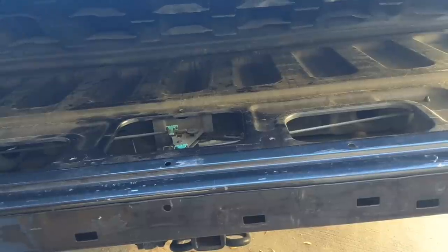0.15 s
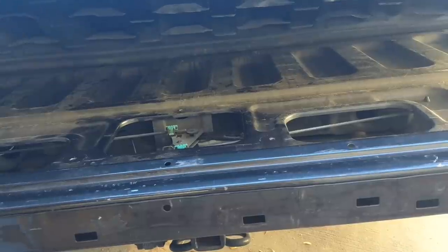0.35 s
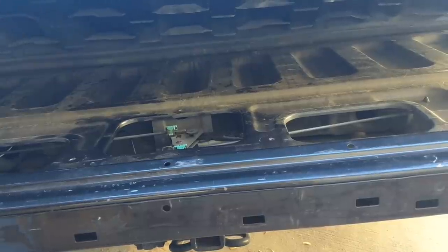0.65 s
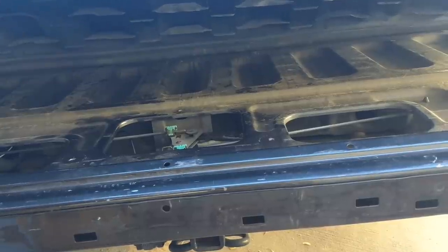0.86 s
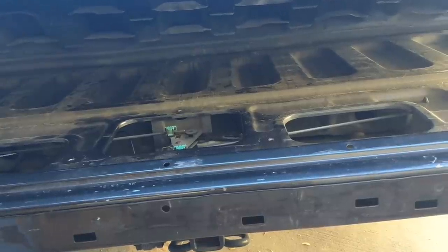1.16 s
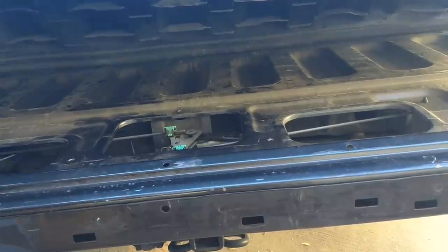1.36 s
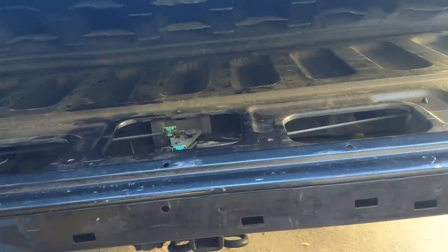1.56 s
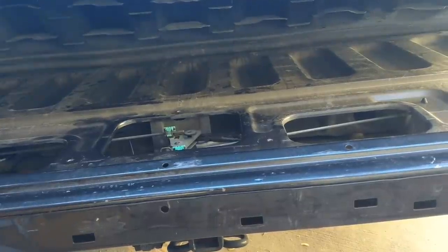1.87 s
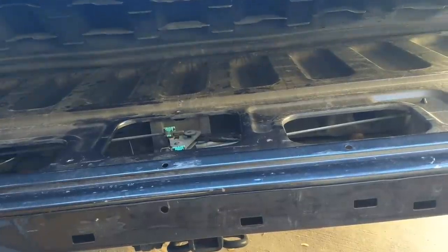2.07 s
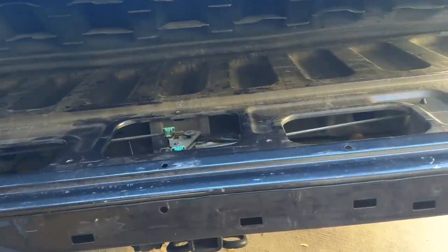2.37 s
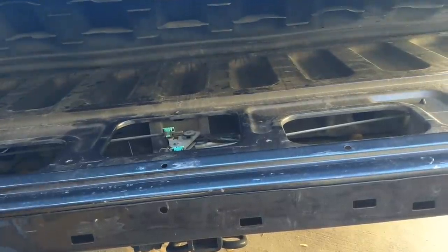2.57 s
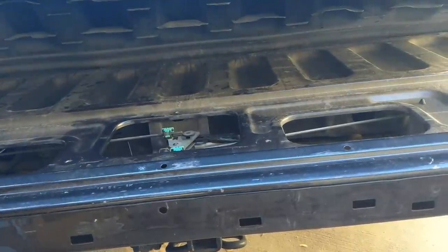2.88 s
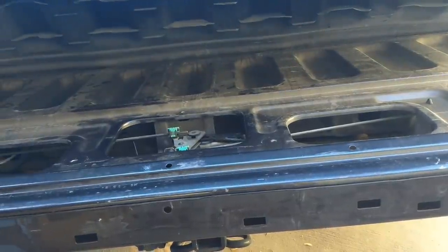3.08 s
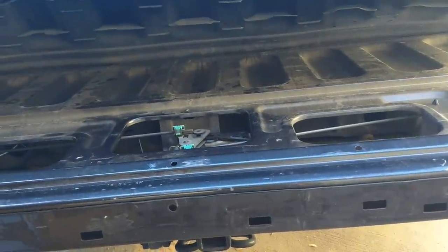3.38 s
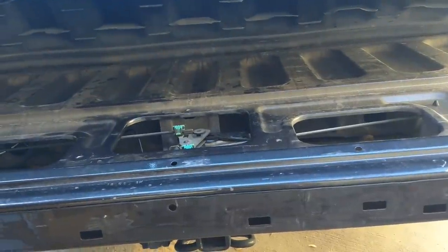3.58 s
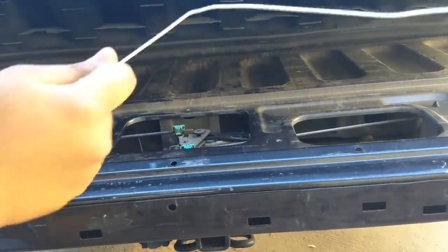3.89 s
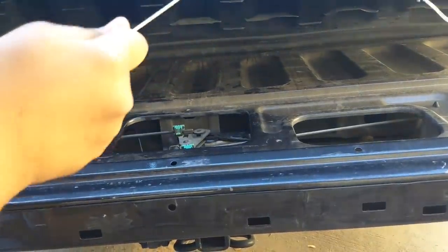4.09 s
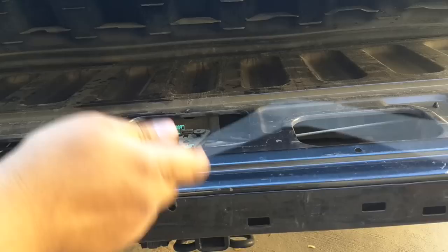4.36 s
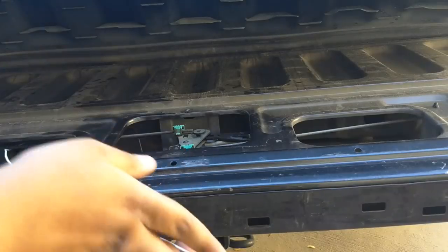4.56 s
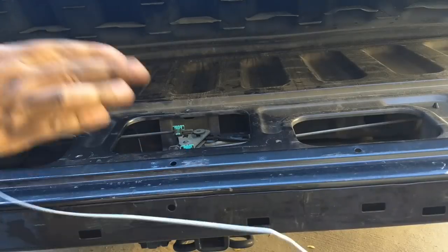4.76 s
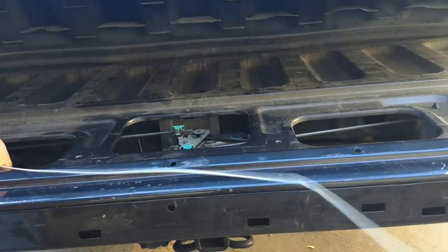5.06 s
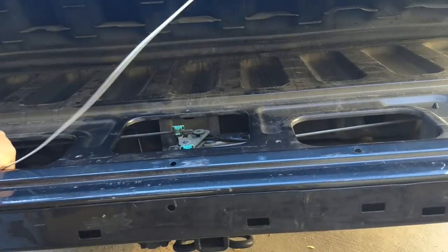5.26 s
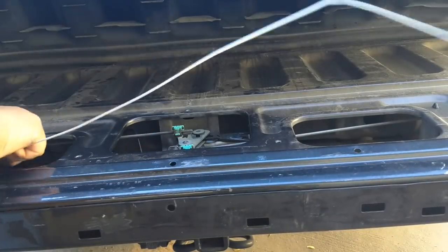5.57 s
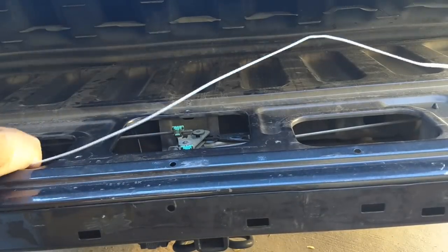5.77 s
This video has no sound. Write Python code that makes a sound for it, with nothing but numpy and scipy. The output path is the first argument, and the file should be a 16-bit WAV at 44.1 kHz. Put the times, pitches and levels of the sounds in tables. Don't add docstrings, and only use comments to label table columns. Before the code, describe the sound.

Thin wire worked through openings in a steel panel: an early heavy knock and faint nudges, busy bright scraping with rattling taps and boomy thuds, then a piercing click followed by near silence. Tapping grows back into another brief rasp and click, finishing with a loud double slap. Close stereo phone microphone, wide treble, distant street rumble.

```python
import sys
import numpy as np
from scipy import signal
from scipy.fft import rfft, irfft, next_fast_len
from scipy.io import wavfile
from scipy.ndimage import uniform_filter1d, minimum_filter1d, map_coordinates

SR = 44100
rng = np.random.default_rng(int(sys.argv[2]) if len(sys.argv) > 2 else 0)


def field_ratio(decibels):
    return 10 ** (np.asarray(decibels, dtype=float) / 20)


def master_out(mix):
    frames = np.transpose(np.atleast_2d(mix))
    ceiling = np.clip(frames, -1, 1)
    pcm = np.round(ceiling * 32767).astype(np.int16)
    wavfile.write(sys.argv[1], SR, pcm)


N = 261513

# [f/Hz, level/dB per Hz]
TRAFFIC_SPECTRUM = [(25, -31), (70, 9), (190, 1.1), (320, -9), (800, -13.5), (2000, -31.5), (15000, -55.5),
                    (16500, -70.5)]
# [f/Hz, width/Hz, level/dB]
AIR_SPACES = [(90, 24, 1), (116.5, 8.1, 7.5), (176, 18, 4.5), (230.2, 18, 3.5), (252, 4, 1),
              (470.6, 16, 5.5), (686, 6.7, 0.5)]
# [f/Hz, level/dB per Hz]
BOOM_SPECTRUM = [(25, -23.5), (60, 4), (110, 1.5), (190, 3), (320, -8.5), (800, -9.5), (1800, -30),
                 (5000, -48)]
# [t/s, level/dB, rise/s]
BUMPS = [(0.307, -23, 0.0026), (1.23, -22, 0.024), (1.51, -20.5, 0.028), (1.655, -28, .02),
         (2.09, -24, 0.023), (2.24, -20, 0.038), (2.35, -17.5, .03), (2.79, -27, 0.0051), (4.16, -32, .03),
         (4.5, -32.5, 0.073), (5.08, -19.5, 0.034), (5.579, -22, 0.042), (5.8, -32, 0.043)]
# [t/s, level/dB]
RUB = [(0, -66), (.4, -60.5), (.74, -67.5), (1.0, -57.5), (1.13, -50.5), (1.44, -39), (1.58, -33.5),
       (1.75, -39.5), (1.95, -41), (2.1, -44.5), (2.31, -61.5), (2.44, -34.5), (2.7, -37), (2.82, -59.5),
       (4.65, -57.5), (4.84, -42.5), (5.11, -36), (5.22, -58.5)]
# [f/Hz, level/dB per Hz]
RASP_SPECTRUM = [(1200, -33), (2200, 11.5), (3300, 3.5), (5000, 4.5), (7200, -10.5), (8200, -13),
                 (10000, -19.5), (12000, -43.5)]
# [f/Hz, level/dB per Hz]
KNOCK_SPECTRUM = [(120, -43), (200, 2.5), (350, -9.5), (600, -2), (850, -0.5), (1500, -6), (2200, -6),
                  (3200, -36.5)]
CLANK_SPECTRUM = [(1200, -33.5), (1900, -6.5), (2600, 3.5), (3300, -1), (3900, -6.5), (5500, -32.5)]
RING_SPECTRUM = [(3600, -12.5), (4800, 1.5), (6000, -4.5), (7200, 1.5), (8200, -9.5), (10000, -24),
                 (12000, -41.5)]
EDGE_SPECTRUM = [(7000, -14), (9000, 2), (10500, -1), (13000, -5), (15300, -8), (16000, -15.5),
                 (16800, -47)]
# [f/Hz, spread/Hz, level/dB]
PANEL_MODES = [(203, 16, -5.5), (482, 28, -12), (756, 30, -26), (836.5, 54, 5), (1050, 52, -0.5),
               (1373, 18, 2.5), (1567, 41, 1.5), (2800, 380, -7.5), (3304, 63, 0), (3587, 100, 2.5),
               (4360, 460, -3.5), (6220, 280, -4), (7880, 290, -15.5), (10100, 250, -19)]
# [f/Hz, level/dB, t60/s]
WIRE_MODES = [(5500, -15.5, 0.22), (5230, -5.5, 0.054), (5540, -20, 5.0), (5700, -3.5, 0.027),
              (5740, -9, 0.054), (7510, -31, 0.35), (7970, -44, 5.0), (8530, -38, 1.8)]
# [t/s, level/dB]
SLAPS = [
    (5.875, -1),
    (5.915, -9),
]
# [t/s, peak level/dB, body re treble/dB]
TICKS = [
    (1.7148, -20.5, -8),
    (2.688, -23, 0),
    (3.0943, -3.5, 1.5),
    (3.0977, -14, 2),
    (5.2305, -3.5, -22.5),
    (5.873, -15.5, 4),
    (5.9148, -19, 3),
]
# [t/s, peak level/dB, weight/dB, t60/s]
CRISP_TAPS = [(.2842, -37, 0, 0.31), (0.6608, -27, -27, .11), (1.1387, -39.5, -21, 0.46),
              (1.4018, -25, -13, .22), (1.5429, -21.5, -1.5, 0.24), (1.6062, -24, -30, 0.21),
              (1.7139, -15, -8.5, .15), (1.9328, -26, 3, 0.2), (2.2642, -17.5, 3.8, 0.24),
              (2.311, -24, 4.5, .14), (2.3446, -19.5, -4.5, .16), (2.4609, -17.5, -6.5, 0.44),
              (2.4783, -16.5, -3, 0.21), (3.1146, -23.5, -1, 0.23), (3.1873, -31.5, -5.5, 0.21),
              (3.7722, -35, -7, 0.22), (4.067, -44.5, -1, 0.19), (4.3565, -21.5, -6.5, 0.18),
              (4.7692, -18.5, -5, 0.35), (4.8766, -18.5, 0.5, 0.19), (4.9708, -20, -4, 0.18),
              (4.9894, -17.5, 0, 0.15), (5.2300, -18.5, -4.5, 0.24), (5.5019, -34, -1, 0.23)]
# [t/s, peak level/dB, weight/dB, t60/s]
PLAIN_TAPS = [(.0034, -31, -12.5, 0.19), (.1989, -40.5, 1.5, 1), (.2309, -34, 1, 0.35),
              (.266, -26, -21, 0.39), (0.3052, -8.5, -10.5, 0.066), (0.9043, -34, -6.5, 0.2),
              (1.067, -39.5, -4, 0.18), (1.2042, -23.5, -5.5, .21), (1.4172, -20.5, -5, 0.23),
              (1.488, -22, -27, 0.27), (1.6377, -20.5, -2, 0.24), (1.8478, -20, -3, .14),
              (1.9904, -27, -18, 0.14), (2.0283, -18, -4.5, 0.21), (2.244, -37, -3, 0.3),
              (2.3792, -25, -17.5, 0.58), (2.5583, -20.5, -31.5, 0.21), (2.9006, -31.5, -4, 0.13),
              (4.1794, -52.5, 13.5, .2), (4.2717, -28.5, -7.5, 0.17), (5.0386, -19.5, 5.5, 0.25),
              (5.201, -32, -5, 0.26), (5.5427, -17.5, -2.5, 0.21), (5.7662, -40.5, 7.5, .28),
              (5.476, -42, -10, 0.14)]
# [t/s, peak level/dB, weight/dB, t60/s]
DULL_TAPS = [(.3914, -34.5, -5, 0.09), (.4609, -47, -18.5, 0.18), (.522, -42.5, -11.5, 0.28),
             (.6649, -27, -3.5, 0.15), (.7552, -39, 2.5, 0.16), (1.0799, -35.5, -3, 0.31),
             (1.3038, -31.5, -15, 0.15), (1.387, -32.5, -5, 0.39), (1.7934, -24, 1.5, 0.19),
             (2.7877, -48.5, 21.5, 0.098), (3.0415, -50.5, 8.5, 0.13), (4.4585, -40.5, 12, 0.15),
             (4.5662, -28.5, 1, .28), (4.7964, -15, -24, 0.071), (5.1517, -27, -20, 0.17),
             (5.6096, -26.5, 1, 0.16), (5.8112, -31.5, -4.5, 0.17), (5.8526, -28.5, -5.5, 0.17)]
# [t/s, peak level/dB, weight/dB, t60/s]
FLAT_TAPS = [
    (1.2456, -30, 1.7, 0.12),
    (4.85, -39.5, 18, 0.18),
    (5.0965, -19, -5.5, 0.096),
    (5.874, -7, -13.5, .18),
    (5.915, -4.5, -25, 0.11),
]
# [t/s, peak level/dB, weight/dB, t60/s]
HEAVY_TAPS = [
    (0.3108, -14.5, 3.5, 0.14),
    (2.6837, -14.5, 0.5, 0.16),
    (3.2915, -35, 15.5, 0.19),
    (4.5876, -18, 0.5, 0.17),
]
# [edge level/dB, clank level/dB]
KIND_COLOURS = [
    (-13.5, -7),
    (-18.5, -7),
    (-24, -6.5),
    (-19, -20.5),
    (-15, -4.5),
]
# [f/Hz, likeness/1]
PORT_LIKENESS = [(50, 1), (130, 0.99), (260, 0.94), (520, 0.66), (800, 0.39), (1300, 0.033), (15000, .02)]
# [f/Hz, level/dB]
BODY_SHADE = [(40, -.8), (130, -1.4), (260, -2), (520, -2.8), (1000, -3.3), (3000, -4), (15000, -4)]
# [f/Hz, level/dB per Hz]
HISS_SPECTRUM = [(300, -22), (2000, -0.5), (9000, 5), (15200, -0.5), (16000, -41.5)]
# [f/Hz, level/dB per Hz]
HANDLING_SPECTRUM = [(25, -8.5), (60, -16), (110, -14), (300, -36.5), (1000, -57.5)]
# [t/s, depth/dB, attack/s]
DUCKS = [
    (3.097, 32.5, 0.014),
    (5.239, 15, 0.072),
]

LOUD_RUB_DB = -35
DRONE_DB, DRONE_PER_RUB = -36.5, 0.56
BOOM_DB, BOOM_PER_RUB = -32.5, 0.35
BUMP_T60_S = 0.38
STREET_DB = -41
RECOVER_S = 0.64
SCATTER_DB, SCATTER_T60_S = -8, 0.01
PORT_LAG_SAMPLES = 18.8
PANEL_TOP_HZ, TOP_HZ = 15600, 16750


def unit(x):
    return x / np.sqrt(np.mean(x ** 2) + 1e-20)


def along(points, hz):
    f, v = np.transpose(points)
    return np.interp(np.log(hz + 1), np.log(f + 1), v)


def rub_level_db():
    s, db = np.transpose(RUB)
    return np.interp(np.arange(N) / SR, s, db)


def wobble(rate_hz):
    knots = rng.standard_normal(int(N * rate_hz / SR) + 4)
    return map_coordinates(knots, [np.arange(N) * rate_hz / SR])


def filtered(x, response):
    m = next_fast_len(N + 8192)
    return irfft(rfft(x, m) * response(np.fft.rfftfreq(m, 1 / SR)), m)[..., :N]


def rush(spectrum, patchy_db):
    z = signal.stft(rng.standard_normal((2, N)), nperseg=512)[2]
    field = uniform_filter1d(rng.standard_normal(z.shape[1:]), size=3, axis=0)
    field = uniform_filter1d(field, size=10, axis=1)
    patches = field_ratio(patchy_db * np.clip(unit(field), -3, 1.3))
    pair = signal.istft(z * patches, nperseg=512)[1][:, :N]
    return unit(filtered(pair, lambda hz: field_ratio(along(spectrum, hz))))


def hollow(x):
    def response(f):
        return 1 + sum(field_ratio(db) / (1 + (2 * (f - hz) / width_hz) ** 2) for hz, width_hz, db in AIR_SPACES)
    return unit(filtered(x, response))


def traffic():
    level_db = STREET_DB + 0.8 * wobble(2.7) + 0.82 * wobble(8.2)
    return field_ratio(level_db) * hollow(rush(TRAFFIC_SPECTRUM, patchy_db=-2.2))


def booms():
    t = np.arange(N) / SR
    rumble_db = BOOM_DB + BOOM_PER_RUB * (rub_level_db() - LOUD_RUB_DB) + 0.5 * wobble(10)
    power = field_ratio(rumble_db) ** 2
    for s, db, rise_s in BUMPS:
        since = np.clip(t - s, 0, None)
        thud = field_ratio(db - 60 * since / BUMP_T60_S) * (1 - np.exp(-since / rise_s))
        power = power + thud ** 2
    return np.sqrt(power) * hollow(rush(BOOM_SPECTRUM, patchy_db=5.0))


def scrape():
    rub_db = rub_level_db()
    burrs = (rng.random(N) < 260 / SR) * field_ratio(10 * rng.random(N))
    catches = signal.lfilter([1], [1, -field_ratio(-60 / (0.012 * SR))], burrs)
    slips = unit(field_ratio(1.5 * wobble(25)) * (1.5 + catches))
    rasp = field_ratio(rub_db) * slips * rush(RASP_SPECTRUM, patchy_db=-1.0)
    edge = field_ratio(1.15 * rub_db - 10) * slips * rush(EDGE_SPECTRUM, patchy_db=2)
    drone_db = DRONE_DB + DRONE_PER_RUB * (rub_db - LOUD_RUB_DB) - 0.8 + 1.2 * wobble(25)
    drone = field_ratio(drone_db) * slips ** 0.4 * rush(KNOCK_SPECTRUM, patchy_db=3.5)
    return rasp + edge + drone


def slaps():
    out, t = np.zeros((2, N + SR)), np.arange(SR // 4) / SR
    hz, level_db, t60_s = np.transpose(WIRE_MODES)[:, :, None]
    for s, db in SLAPS:
        phase = 2 * np.pi * rng.random((2, len(hz), 1))
        fade = field_ratio(db + level_db - 60 * t / np.clip(t60_s, 0.04, 0.2))
        fade = fade * (1 - np.exp(-t / 0.00085))
        modes = fade * np.sin(2 * np.pi * hz * t + phase)
        out[:, round(s * SR):][:, :len(t)] += modes.sum(axis=1)
    return out[:, :N]


def ticks():
    out, t = np.zeros((2, N + 200)), np.arange(200) / SR

    def burst(hz, t60_s, phase=0):
        return field_ratio(-60 * t / t60_s) * np.sin(2 * np.pi * hz * t + phase)

    body = 0.83 * burst(4300, 0.0031) + 0.15 * burst(1400, 0.0024, 0.6)
    tip = 1.3 * burst(11500, 0.00063)
    tip = tip + 0.4 * burst(15000, 0.00067) + 0.35 * burst(6600, 0.00067)
    for s, db, body_db in TICKS:
        grit = 0.4 * field_ratio(-60 * t / 0.0027) * rng.standard_normal((2, len(t)))
        pulse = tip + field_ratio(body_db) * body + grit
        i = round(s * SR)
        out[0, i:][:len(t)] += field_ratio(db) * pulse[0]
        out[1, i + 4:][:len(t)] += field_ratio(db - 3) * pulse[1]
    return out[:, :N]


def taps():
    t = np.arange(SR // 3) / SR
    power, ring = np.zeros((4, N + SR)), np.zeros((2, N + SR))
    hz, spread_hz, level_db = np.transpose(PANEL_MODES)[:, :, None]
    band_t60 = np.array([[1.5], [1.15], [1], [0.75]])
    kinds = (CRISP_TAPS, PLAIN_TAPS, DULL_TAPS, FLAT_TAPS, HEAVY_TAPS)
    contacts = [(*row, *colour) for rows, colour in zip(kinds, KIND_COLOURS) for row in rows]
    for s, db, knock_db, t60_s, edge_db, clank_db in contacts:
        i, t60_s = round(s * SR), np.clip(t60_s, 0.02, 0.5)
        here = slice(i, i + len(t))
        swell = 1 - np.exp(-t / (0.055 * t60_s ** 2))

        crack = 1 + 0.23 * field_ratio(-60 * t / 0.0027)
        start_db = db + np.array([[knock_db - 7.0], [clank_db - 4], [-8], [edge_db + 2.0]])
        power[:, here] += (swell * crack * field_ratio(start_db - 60 * t / (t60_s * band_t60))) ** 2

        luck = np.clip(rng.standard_normal((4, len(hz), 1)), -2, 1.3)
        colour_db = np.interp(np.log(hz), np.log([1500, 3470, 5960, 12000]),
                              [knock_db, clank_db + 3.5, 0, edge_db + 16.5])
        share = field_ratio(level_db + colour_db + 3.5 * luck[0] - 60 * t / (0.75 * t60_s))
        mode_hz = hz + 0.78 * spread_hz * luck[1]
        for port in (0, 1):
            wave = np.sin(2 * np.pi * mode_hz * t + 4 * luck[2 + port])
            ring[port, here] += field_ratio(db - 16.5) * swell * (share * wave).sum(axis=0)
    spectra = (KNOCK_SPECTRUM, CLANK_SPECTRUM, RING_SPECTRUM, EDGE_SPECTRUM)
    bands = [rush(spectrum, patchy_db=6.5) for spectrum in spectra]
    return ring[:, :N] + sum(np.sqrt(p[:N]) * band for p, band in zip(power, bands))


def scene():
    sound = traffic() + booms() + scrape() + slaps() + taps()

    def blend(hz):
        turn = np.arccos(np.clip(along(PORT_LIKENESS, hz), -1, 1)) / 2
        return np.array([np.cos(turn), np.sin(turn)]) * (hz < PANEL_TOP_HZ)

    same, other = filtered(sound, blend)
    far = filtered(same - other, lambda hz: field_ratio(along(BODY_SHADE, hz)))
    return np.array([same + other, far]) + ticks()


def ducking_db():
    gain_db = np.zeros(N)
    for s, depth_db, attack_s in DUCKS:
        since = np.clip(np.arange(N) / SR - s, 0, None)
        gain_db -= depth_db * (1 - np.exp(-since / attack_s)) * np.exp(-since / RECOVER_S)
    return gain_db


def scattered(dry):
    t = np.arange(SR // 50) / SR
    paths = np.diff(rng.standard_normal((2, len(t) + 1))) * field_ratio(-60 * t / SCATTER_T60_S)
    paths = paths / np.linalg.norm(paths[0])
    return field_ratio(SCATTER_DB) * signal.fftconvolve(dry, paths, axes=1)[:, :N]


def masked(pair, under, before_db):
    sum_diff = np.array([pair[0] + pair[1], pair[0] - pair[1]])
    hz, _, z = signal.stft(sum_diff, SR, nperseg=512)
    band = np.unique((np.log(hz + 2500) * 18).astype(int), return_inverse=True)[1]
    power = np.array([np.mean(np.abs(z[:, band == b]) ** 2, axis=1) for b in range(band.max() + 1)])

    slow_db = 10 * np.log10(np.abs(uniform_filter1d(power, size=4, axis=2)) + 1e-14)
    drift = uniform_filter1d(rng.standard_normal(slow_db.shape), size=12, axis=2)
    slow_db = slow_db + 7 * drift
    held = np.minimum(np.arange(z.shape[2]) // 4 * 4 + 2, z.shape[2] - 1)
    slow_db = slow_db[..., held]

    treble_db = 10 * np.log10(power[-16:].sum(axis=(0, 1)) + 1e-14)
    jump_db = np.roll(treble_db, -2) - treble_db
    calm = -minimum_filter1d(-jump_db, size=6, origin=2) < 9
    busy_db = 0.12 * (uniform_filter1d(treble_db, size=8) - np.median(treble_db))
    busy_db = np.clip(busy_db, -3, 2.5)

    excess_db = (slow_db[:, ::-1] - slow_db)[band]
    covered = (excess_db > along(under, hz)[:, None, None] - busy_db) & calm
    limit_db = before_db + 60000 / (hz + 1)[:, None, None]
    limit_db = limit_db + 4 * rng.standard_normal((len(power), 1, 1))[band]
    ahead = jump_db > limit_db
    kept = ~(covered | ahead).transpose(1, 0, 2)
    total, diff = signal.istft(z * kept, SR, nperseg=512)[1][:, :N]
    return np.array([total + diff, total - diff]) / 2


def roll_off(x):
    return signal.sosfilt(signal.butter(12, 16720, fs=SR, output="sos"), x)


def record(dry):
    gain_db = ducking_db()
    hiss = field_ratio(0.36 * gain_db - 72.5) * rush(HISS_SPECTRUM, patchy_db=-3.5)
    ports = field_ratio(gain_db) * dry + hiss
    late = filtered(ports, lambda hz: 0.9 * np.exp(-2j * np.pi * hz * PORT_LAG_SAMPLES / SR))
    handling = field_ratio(0.5 * gain_db - 68.5) * rush(HANDLING_SPECTRUM, patchy_db=3.0)
    steered = ports - late[::-1] + scattered(ports) + handling
    steered = filtered(steered, lambda hz: hz < TOP_HZ)
    under = [(1500, 40), (2000, 9), (4000, 14), (7500, 13), (9000, 4), (16000, 1)]  # f/Hz, excess/dB
    mix = masked(np.clip(steered, -1, 1), under, before_db=14)
    return roll_off(mix)


dry = scene()
out = record(dry)
master_out(out)
```